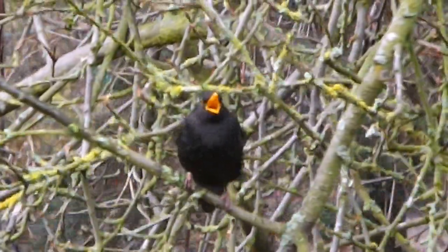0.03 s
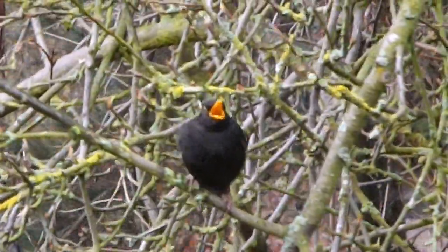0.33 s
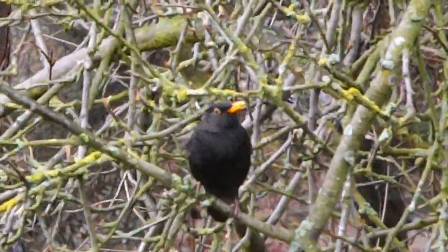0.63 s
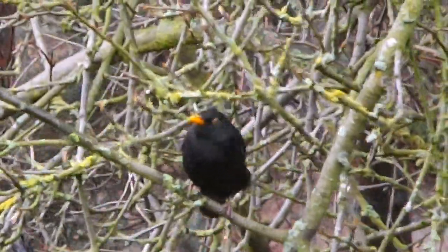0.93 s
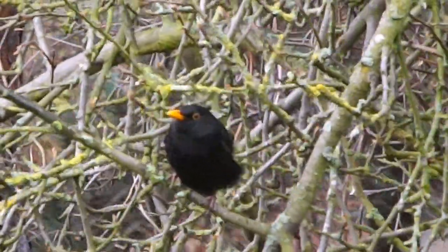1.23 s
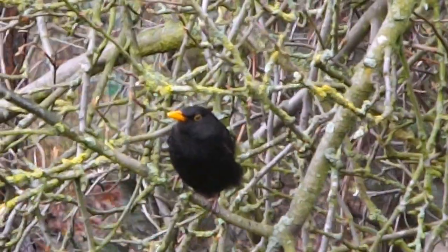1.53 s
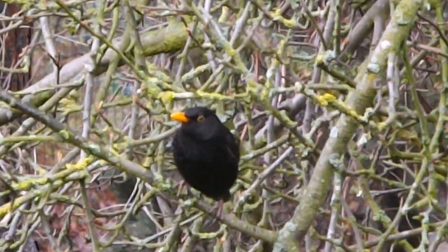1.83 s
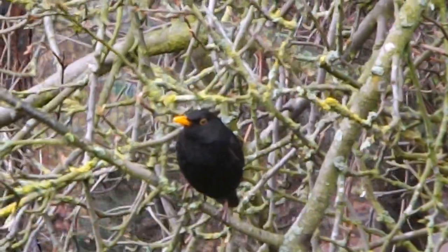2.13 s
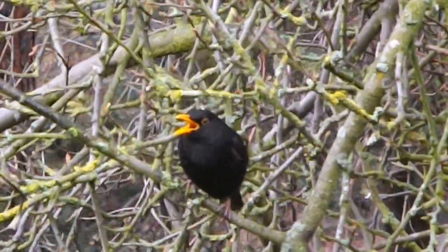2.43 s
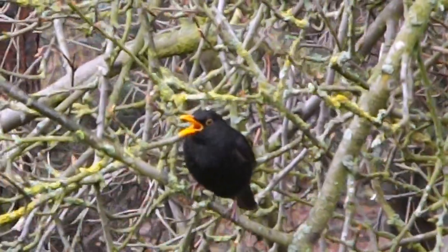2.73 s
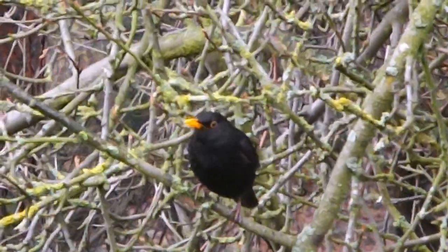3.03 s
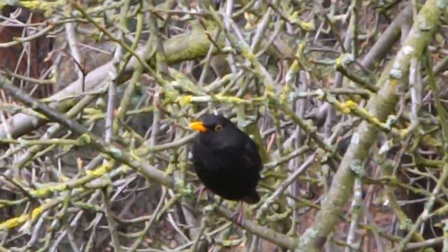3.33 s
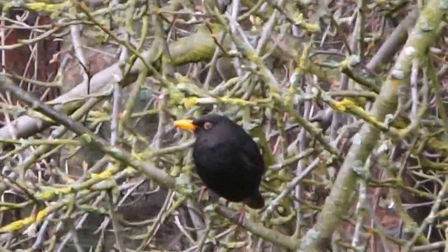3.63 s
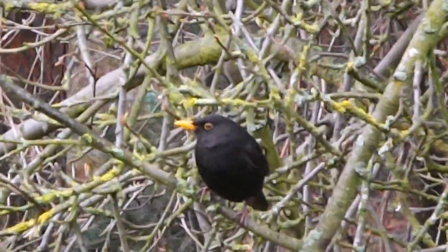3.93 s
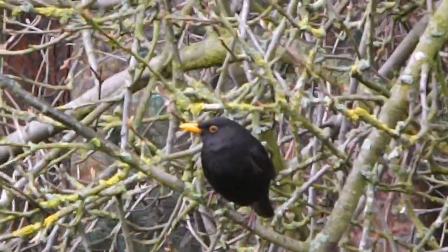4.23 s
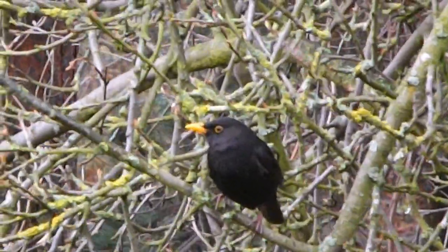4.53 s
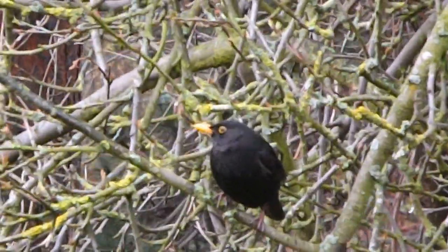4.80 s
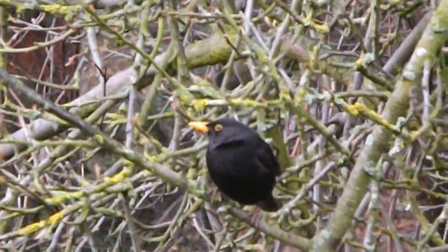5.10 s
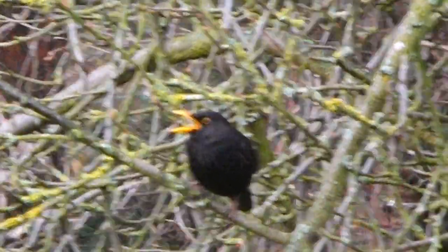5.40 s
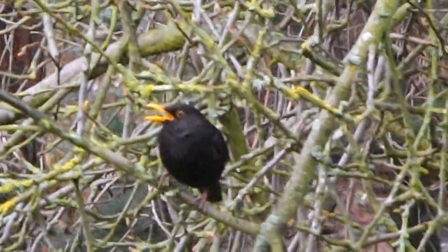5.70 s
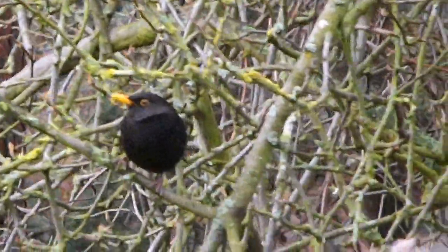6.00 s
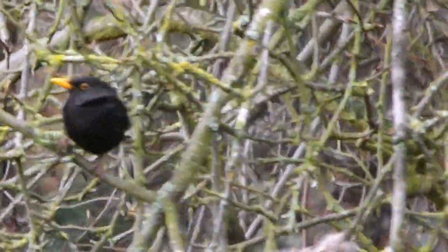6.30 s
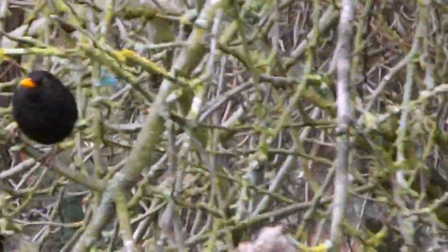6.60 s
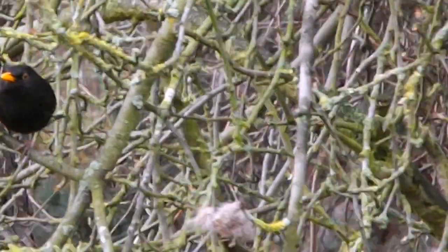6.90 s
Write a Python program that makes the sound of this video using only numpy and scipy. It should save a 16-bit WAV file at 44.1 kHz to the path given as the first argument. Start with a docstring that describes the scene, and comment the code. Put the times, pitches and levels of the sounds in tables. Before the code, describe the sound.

A blackbird gives three thin, high whistles over a steady rush of distant traffic, with a sharp click and soft microphone bumps.

```python
"""A thin, high alarm whistle is already sounding: a blackbird in a bare thicket gives three in all,
and branches and twigs scatter each into a fluttering blur on its way to the microphone.
Distant traffic rushes steadily behind it, and later small birds peep far away. Close up are two faint
ticks and the hand-held camera that carries the one microphone: it clicks once, takes a few soft bumps
and rumbles faintly as it is moved."""
import sys
import numpy as np
from scipy import signal
from scipy.fft import rfft, irfft, next_fast_len
from scipy.io import wavfile
from scipy.ndimage import map_coordinates

SR = 44100
rng = np.random.default_rng(int(sys.argv[2]) if len(sys.argv) > 2 else 0)


def transcribe(u):
    """Save the signal u as a 16-bit wav file named by the first command-line argument.

    u: samples, shape (n,) or (channels, n), limited to [-1, 1]; the rate is SR.
    q: integer samples, one column per channel.
    """
    v = np.clip(np.atleast_2d(u).T, -1, 1)
    q = np.round(v * 32767).astype(np.int16)
    wavfile.write(sys.argv[1], SR, q)


N = 306495

# The blackbird in the thicket. Each row: start in seconds, top pitch in Hz, rise time in seconds, sag in
# Hz per second, relative level in dB, fade in dB per second, hold in seconds, release in dB per second.
WHISTLES = [(-.07, 8530, .042, 170, -34.5, 12, .505, 500), (2.312, 8730, .053, 680, -33.5, 1, .36, 125),
            (5.147, 8490, .034, -60, -37.5, 11, .5, 450)]
# The whistle as heard dips briefly where echoes cancel it.
# Each row: time in seconds, depth in dB, half length in seconds.
LEVEL_DIPS = [(.07, 13, .02), (.235, 11, .025), (.355, 18, .009), (.398, 24, .013), (2.41, 10, .008),
              (2.505, 4, .03), (5.165, 6, .017), (5.275, 5, .03), (5.42, 13, .028), (5.598, 13, .026)]
# The distant roads. Each row: time in seconds, relative levels of roar and of tyre hiss in dB.
TRAFFIC_LEVELS = [(0.0, -39, -39.5), (0.35, -40, -40), (0.68, -39, -41), (0.91, -39.5, -43),
                  (2.07, -39, -41.5), (2.9, -40.5, -43.5), (3.66, -40, -43), (4.37, -40.5, -43.5),
                  (4.7, -40, -43), (6.08, -40, -43), (6.37, -39, -42.5), (6.95, -38.5, -42.5)]
# Spectra of road roar, tyres, faint high hiss and the hand on the camera.
# Each row: frequency in Hz, relative level in dB.
ROAR_SPECTRUM = [(25, -34), (50, -29.5), (100, -16), (200, -11), (320, -8.5), (450, -4), (650, -0.5),
                 (1050, 1), (1230, -0.5), (1370, -3.5), (1570, -1), (1850, -9), (2600, -16.5), (5000, -60)]
TYRE_SPECTRUM = [(600, -33), (1400, -18.5), (1900, -5), (2250, -4), (2650, -0.5), (2950, -4), (3300, -8.5),
                 (4000, -18), (5000, -25.5), (8000, -38)]
AIR_SPECTRUM = [(1500, -24), (4000, -1.3), (6000, 0.1), (7500, 1.5), (9500, -2), (12000, -2), (15500, -4)]
HANDLING_SPECTRUM = [(20, -20), (45, -10), (80, -4), (170, 0), (300, -1), (500, -12), (1200, -60)]
# Faint dry ticks. Each row: start in seconds, level in dB, seconds to fall by 60 dB.
TICKS = [(.378, -52, .02), (5.798, -44.5, .06)]
# The snap of the camera's plastic shell: time in seconds, level in dB, pitch in Hz, half length in seconds.
SHELL_SNAP = (.4968, -14.5, 2450, .0005)
# The shell's modes. Each row: frequency in Hz, level in dB against the snap, seconds to fall by 60 dB.
SHELL_MODES = [(1520, -10, .025), (2130, -12, .006), (2770, -5.5, 0.016), (3310, -5, .013),
               (5020, -20, 0.024), (6600, -20.5, .009)]
# Soft bumps on the camera. Each row: time in seconds, peak in dB, pitch in Hz, half length in seconds.
BUMPS = [(1.012, -41, 210, .004), (1.138, -44, 130, .005), (1.21, -36, 230, 0.0022), (1.22, -36, 197, .006),
         (1.4, -27.5, 258, 0.003), (1.406, -40, 126, .007), (1.452, -35, 283, .003),
         (1.785, -36, 270, .003)]
# The hand shifts its grip. Each row: time in seconds, rumble level in dB, half length in seconds.
GRIP_SHIFTS = [(1.25, -55, .26), (1.836, -53.5, 0.24), (2.23, -55.5, .05)]
# Small birds far off. Each row: time in seconds, level in dB, pitch in Hz, half length in seconds.
PEEPS = [(2.82, -62, 5850, .025), (3.8, -68, 7200, .04), (3.98, -64, 7200, .055), (4.2, -67, 7200, .04),
         (4.6, -67, 5930, .045), (4.77, -62, 5980, .06)]


def amp(db):
    """Decibels to gain."""
    return 10 ** (np.asarray(db) / 20)


def unit(x):
    """Scaled to rms 1."""
    return x / np.sqrt(np.mean(x ** 2) + 1e-20)


def clock():
    """The time of every sample in seconds."""
    return np.arange(N) / SR


def wobble(rate):
    """A smooth random curve, rate knots a second."""
    return map_coordinates(rng.standard_normal(int(N * rate / SR) + 4), [clock() * rate])


def swell(s, half):
    """A bell-shaped rise and fall around time s."""
    return np.exp(-np.minimum(((clock() - s) / half) ** 2, 20))


def filtered(x, response):
    """x through a filter whose response is a function of Hz."""
    size = next_fast_len(N + SR // 2)
    return irfft(rfft(x, size) * response(np.fft.rfftfreq(size, 1 / SR)), size)[..., :N]


def rush(spectrum):
    """Noise of rms 1, coloured by a spectrum read on a log frequency axis."""
    points_hz, points_db = np.transpose(spectrum)
    colour = lambda hz: amp(np.interp(np.log(hz + 1), np.log(points_hz), points_db))
    return unit(filtered(rng.standard_normal(N), colour))


def whistle(age, dip_db, top_hz, rise, sag, db, fade, hold, release,
            start_hz=6750, attack_s=.032, sag_after_s=.17,
            droop_hz_per_db=7, quiver_hz=12, flutter_db=1.7):
    """The syrinx sings a pure tone that sweeps up, holds and dies away; as heard, it dips briefly."""
    sweep = top_hz - (top_hz - start_hz) * np.exp(-age / rise)
    droop = droop_hz_per_db * dip_db  # the pitch drops slightly in each dip
    pitch = sweep - sag * np.maximum(age - sag_after_s, 0) - droop
    level_db = db - fade * age - release * np.maximum(age - hold, 0) - dip_db
    attack = 1 - np.exp(-age / attack_s)
    phase = 2 * np.pi * np.cumsum(pitch + quiver_hz * wobble(130)) / SR
    return np.sqrt(2) * attack * amp(level_db + flutter_db * wobble(90)) * np.sin(phase)


def branches(call, count=6):
    """A few thick branches return early copies, which beat against a moving pitch."""
    delays_s = rng.uniform(.004, .045, count)
    return sum(np.pad(call, (int(delay * SR), 0))[:N] for delay in delays_s) / np.sqrt(count)


def thicket(call, t60=0.51, build_up_s=0.0026):
    """Countless twigs around the bird send back a dense, quickly dying echo."""
    t = np.arange(SR // 2) / SR
    tail = rng.standard_normal(len(t)) * amp(-60 * t / t60) * (1 - np.exp(-t / build_up_s))
    return signal.fftconvolve(call, tail / np.linalg.norm(tail))[:N]


def blackbird(direct_db=1.0, branch_db=-13, echo_db=-10.0):
    """Each whistle reaches the microphone straight and off the wood, by new paths as the head turns."""
    lead = SR // 10  # the first whistle is already under way, so the echo of its rise hangs in the air
    dip_db = sum(depth_db * swell(s + lead / SR, half) for s, depth_db, half in LEVEL_DIPS)
    calls = [whistle(np.maximum(clock() - lead / SR - s, 0), dip_db, *shape) for s, *shape in WHISTLES]
    heard = sum(amp(direct_db) * call + amp(branch_db) * branches(call) + amp(echo_db) * thicket(call)
                for call in calls)
    return np.pad(heard[lead:], (0, lead))


def traffic(roar_db=0.5, tyres_db=0.37, air_db=-54.5, waver_db=0.46):
    """Far roads blend into a gently wavering roar and tyre hiss, over a faint even hiss."""
    times, road_levels, hiss_levels = np.transpose(TRAFFIC_LEVELS)
    road_db = np.interp(clock(), times, road_levels) + roar_db
    hiss_db = np.interp(clock(), times, hiss_levels) + tyres_db
    roar = amp(road_db + waver_db * wobble(7)) * rush(ROAR_SPECTRUM)
    tyres = amp(hiss_db + waver_db * wobble(4.91)) * rush(TYRE_SPECTRUM)
    return roar + tyres + amp(air_db) * rush(AIR_SPECTRUM)


def ticks(low_hz=2500, high_hz=8500):
    """Short, faint crackles of bright noise, with no echo."""
    t = clock()
    bursts = sum(amp(db - 60 * np.maximum(t - s, 0) / t60) * (t >= s) for s, db, t60 in TICKS)
    band = lambda hz: (hz / low_hz) ** 2 / (1 + (hz / low_hz) ** 3) / (1 + (hz / high_hz) ** 8)
    return bursts * unit(filtered(rng.standard_normal(N), band))


def contact(s, db, hz, half):
    """A knock on the camera, too damped to ring: only a cycle or two."""
    return amp(db) * swell(s, half) * np.cos(2 * np.pi * hz * (clock() - s))


def shell_click(attack_s=0.0005):
    """Right at the microphone the plastic shell snaps, then its modes ring for some milliseconds."""
    s, db = SHELL_SNAP[:2]
    age = np.maximum(clock() - s, 0)
    ring = sum(amp(level - 60 * age / t60) * np.sin(2 * np.pi * hz * age)
               for hz, level, t60 in SHELL_MODES)
    return contact(*SHELL_SNAP) + amp(db) * ring * (1 - np.exp(-age / attack_s))


def handling(steady_hand_db=-77.5, lumpy_db=3):
    """The shifting hand rumbles through the camera body into the microphone and bumps it now and then."""
    grip = amp(steady_hand_db) + sum(amp(db) * swell(s, half) for s, db, half in GRIP_SHIFTS)
    rumble = grip * amp(lumpy_db * wobble(25)) * rush(HANDLING_SPECTRUM)
    return rumble + sum(contact(*bump) for bump in BUMPS)


def far_birds(blur_hz=95):
    """Distance smears each peep into a soft, unsteady tone."""
    drift_cycles = np.cumsum(blur_hz * wobble(300)) / SR
    return np.sqrt(2) * sum(amp(db) * swell(s, half) * np.sin(2 * np.pi * (hz * clock() + drift_cycles))
                            for s, db, hz, half in PEEPS)


def scene():
    """Birds, far roads and close camera noises reach one microphone that feeds both channels."""
    mono = traffic() + handling() + blackbird() + far_birds() + shell_click() + ticks()
    return np.array([mono, mono])


def record(dry, hiss_db=-78, skew_above_hz=750, top_hz=15900):
    """Each channel adds a trace of bright hiss, and the treble ends at a steep band limit."""
    lag_s = np.array([[.5], [-.5]]) / SR  # above the bass, left runs one sample behind right
    skew = lambda hz: np.exp(-2j * np.pi * hz * lag_s * hz ** 2 / (hz ** 2 + skew_above_hz ** 2))
    hiss = amp(hiss_db) * np.diff(rng.standard_normal((2, N + 1)))
    return filtered(dry + hiss, lambda hz: (hz < top_hz) * skew(hz))


dry = scene()
out = record(dry)
transcribe(out)
```